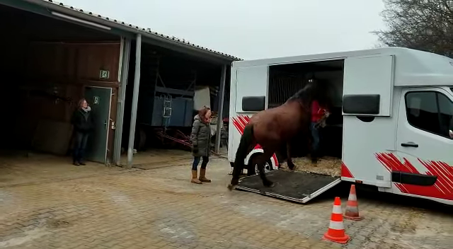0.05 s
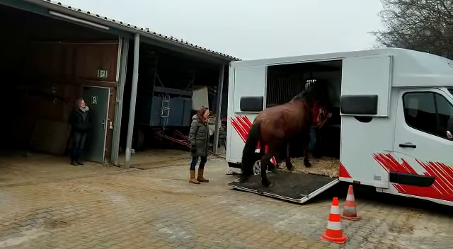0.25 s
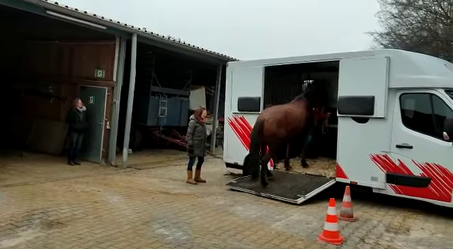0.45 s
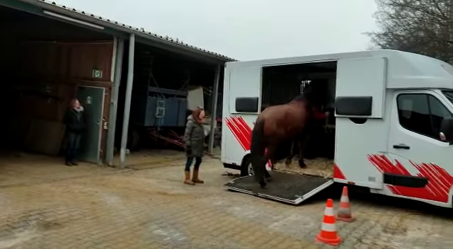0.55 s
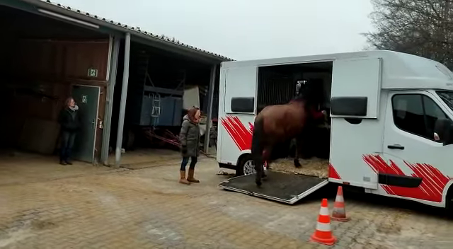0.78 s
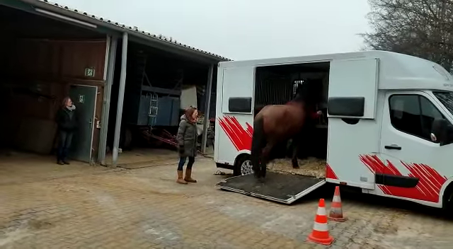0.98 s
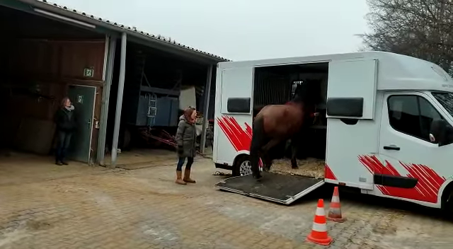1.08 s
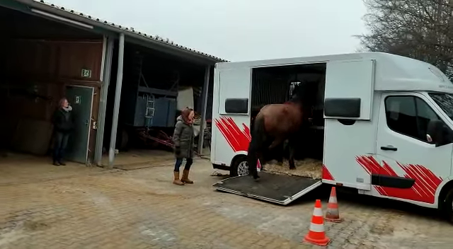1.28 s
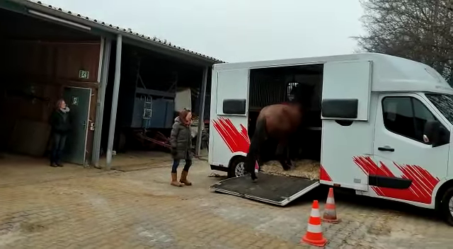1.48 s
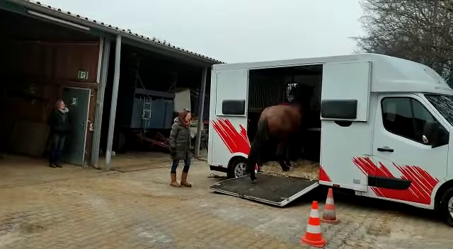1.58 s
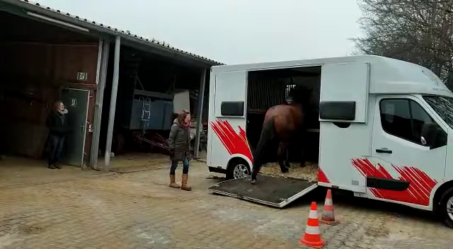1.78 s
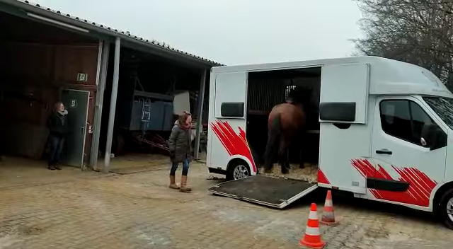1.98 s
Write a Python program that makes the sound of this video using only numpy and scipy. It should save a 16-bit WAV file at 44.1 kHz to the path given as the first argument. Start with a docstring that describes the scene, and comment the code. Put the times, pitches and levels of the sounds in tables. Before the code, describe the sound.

A horse's hooves thud up a hollow loading ramp, with a faint engine idling.

```python
"""A horse walks up a hollow loading ramp into a horsebox, a few metres from a stereo microphone in a yard.
One hoof knocks on the ramp, the next on the box floor, bouncing each deck and ringing its panels.
Softer steps follow inside, with small clicks of horn on grit or metal and rustling bedding.
The sheds give a weak echo; further right, an engine idles faintly under a light wind."""
import sys
import numpy as np
from scipy import signal
from scipy.fft import rfft, irfft, next_fast_len
from scipy.io import wavfile
from scipy.ndimage import map_coordinates

SR = 44100
rng = np.random.default_rng(int(sys.argv[2]) if len(sys.argv) > 2 else 0)


def wrap_up_sound(samples):
    """Save the sound to the file named by the first command line argument, as 16-bit audio."""
    columns = np.atleast_2d(samples).T
    # keep every value between -1 and 1, then stretch to whole-number steps
    tamed = np.clip(columns, -1, 1)
    steps = np.round(tamed * 32767).astype(np.int16)
    wavfile.write(sys.argv[1], SR, steps)


N = 90404

# how alike the horse's noises are in the two channels: f/Hz, likeness
HORSE_ALIKE = [(100, .998), (400, 0.96), (900, 0.95), (2000, 0.18), (6000, 0.081)]


def amp(db):
    return 10 ** (np.asarray(db) / 20)


def unit_rms(x):
    return x / np.sqrt(np.mean(x ** 2) + 1e-20)


def along(points, hz):
    """Read (f/Hz, value) points on a log frequency axis."""
    f, values = np.transpose(points)
    return np.interp(np.log(hz + 1), np.log(f + 1), values)


def wobble(rate):
    """A smooth random curve, rate knots a second."""
    knots = rng.standard_normal(int(N * rate / SR) + 4)
    return map_coordinates(knots, [np.arange(N) * rate / SR])


def filtered(x, response):
    """Shape x by a response given as a function of frequency."""
    n = x.shape[-1]
    padded = next_fast_len(n + 4096)
    hz = np.fft.rfftfreq(padded, 1 / SR)
    return irfft(rfft(x, padded) * response(hz), padded)[..., :n]


def noise(size, colour, alike):
    """Coloured stereo noise of rms 1 with a given left-right likeness."""
    def mid_side_gains(hz):
        angle = np.arccos(np.clip(along(alike, hz), -1, 1)) / 2
        return colour(hz) * [np.cos(angle), np.sin(angle)]
    mid, side = filtered(rng.standard_normal((2, size)), mid_side_gains)
    return unit_rms(np.array([mid + side, mid - side]))


def band(centre_hz, octaves):
    """A bell-shaped colour on a log frequency axis."""
    return lambda hz: np.exp(-.5 * (np.log2((hz + 1) / centre_hz) / octaves) ** 2)


def fade(t, rise_s, t60):
    """A quick rise and an exponential decay."""
    return (1 - np.exp(-t / rise_s)) * np.exp(-np.log(1000) * t / t60)


def burst(t, centre_hz, t60, octaves, rise_s):
    """A dying band of noise, with the same energy on every blow."""
    envelope = fade(t, rise_s, t60)
    hiss = noise(len(t), band(centre_hz, octaves), HORSE_ALIKE)
    return unit_rms(envelope * hiss) * np.sqrt(np.mean(envelope ** 2))


def add(out, start_s, sound):
    """Mix a sound in at start_s."""
    part = out[:, round(start_s * SR):][:, :sound.shape[-1]]
    part += sound[..., :part.shape[-1]]


def from_right(x, lag_s):
    """Sound from the right reaches the left microphone port lag_s later."""
    return filtered(x, lambda hz: np.exp(-2j * np.pi * hz * lag_s * np.array([[.5], [-.5]])))


def wind():
    """Light wind and distant noise, swelling a little."""
    # spectrum of the open air: f/Hz, relative level/dB
    spectrum = [(20, -4), (60, -6), (100, -18), (180, -18.5), (300, -27), (650, -28), (1100, -30),
                (1900, -29), (3000, -40), (5000, -49), (7700, -52), (8600, -64.5), (14000, -59)]
    # how alike the air is in the two channels: f/Hz, likeness
    alike = [(40, 0.59), (200, 1), (600, 0.52), (1300, 0.37), (8000, 0.033)]
    level_db = -50 + 0.5 * wobble(4.5)
    return amp(level_db) * noise(N, lambda hz: amp(along(spectrum, hz)), alike)


def engine():
    """An idling engine hums at multiples of its slightly unsteady firing rate."""
    # partials of the hum: multiple of the firing rate, level/dB
    orders = [(1, -49.5), (2, -57), (3, -71.5), (4, -71)]
    firing_hz, drift, waver_db = 43.92, 0.0077, 1.46
    phase = 2 * np.pi * np.cumsum(firing_hz * (1 + drift * wobble(5))) / SR
    hum = np.zeros(N)
    for order, db in orders:
        peak = np.sqrt(2) * amp(db + waver_db * wobble(11.07))
        hum += peak * np.sin(order * phase + rng.uniform(0, 2 * np.pi))
    return hum


def yard_echo(x):
    """The echo off the sheds round the yard, nearly mono in the bass."""
    # reverberation time of the yard: f/Hz, t60/s
    decay_times = [(100, 0.5), (350, 0.52), (1000, 0.67), (8000, 0.099)]
    # colour of the echo: f/Hz, relative level/dB
    colour = [(70, -8.5), (350, -2.5)]
    # how alike the echo is in the two channels: f/Hz, likeness
    alike = [(150, 0.82), (500, 0.3), (1200, 0.045)]
    reflections = noise(SR // 2, lambda hz: amp(along(colour, hz)), alike)
    hz, t, spectra = signal.stft(reflections, SR, nperseg=256)
    decay = np.exp(-np.log(1000) * t / along(decay_times, hz)[:, None])
    _, tail = signal.istft(spectra * decay, SR, nperseg=256)
    return signal.fftconvolve(x, tail / np.linalg.norm(tail[0]), axes=1)[:, :N]


def bedding():
    """The bedding in the box gives a faint, fluttering rustle as the horse moves in."""
    # course of the rustle: t/s, level/dB
    rustle = [(0, -80), (.3, -74.5), (.55, -75.5), (.7, -74.5), (.85, -81), (1, -78.5), (1.15, -81.5),
              (2.05, -79)]
    course_db = np.interp(np.arange(N) / SR, *np.transpose(rustle))
    flutter_db = wobble(60)
    return amp(course_db + flutter_db) * noise(N, band(centre_hz=7000, octaves=1), HORSE_ALIKE)


def hoof_clicks():
    """Short bright cracks and scuffs where horn meets grit or metal."""
    # hard contacts: t/s, level/dB, centre f/Hz, width/octaves, t60/s
    contacts = [(.21, -67.5, 6760, .6, 0.28), (.4555, -34.5, 1456, 0.2, 0.038),
                (.4555, -46.5, 2530, 0.17, 0.044), (.4555, -50.5, 5870, 0.41, 0.015),
                (.904, -56, 6860, 0.54, 0.013), (1.524, -54.5, 13350, 0.13, 0.017),
                (1.524, -62, 2900, 1.1, 0.13), (1.538, -67, 10000, 1.2, 0.26)]
    out, t = np.zeros((2, N)), np.arange(SR // 3) / SR
    for start_s, db, hz, octaves, t60 in contacts:
        add(out, start_s, amp(db) * burst(t, hz, t60, octaves, rise_s=0.001))
    return out


def struck_deck(steps, modes, panels, bounce_hz, bounce_rise_s, bounce_t60):
    """The horse's weight bounces the whole deck, and each hoof rings its modes and panels."""
    out, t = np.zeros((2, N)), np.arange(SR // 2) / SR
    bounce = fade(t, bounce_rise_s, bounce_t60) * np.sin(2 * np.pi * bounce_hz * t)
    for start_s, knock_db, cutoff_hz, bounce_db in steps:
        ring = np.zeros(len(t))
        for k, (hz, db, t60) in enumerate(modes):
            strength = (-1) ** k * amp(db + rng.normal(0, 0.68))
            ring += strength * fade(t, rise_s=.0015, t60=t60) * np.sin(2 * np.pi * hz * t)
        clatter = sum(amp(db) * burst(t, hz, t60, octaves=.35, rise_s=.0022) for hz, db, t60 in panels)
        lowpass = signal.butter(2, cutoff_hz, fs=SR, output="sos")  # a soft contact loses the treble
        knock = signal.sosfilt(lowpass, ring + clatter)
        add(out, start_s, amp(knock_db) * knock - amp(bounce_db) * bounce)
    return out


def hooves_on_ramp():
    """Hooves knock on the hollow loading ramp."""
    # hoof falls: t/s, knock level/dB, contact cutoff f/Hz, bounce level/dB
    steps = [(.2115, -23.5, 1500, -42), (.235, -44, 1180, -14), (.384, -40.5, 302, -79),
             (1.171, -50.5, 590, -73)]
    # modes of the ramp: f/Hz, relative level/dB, t60/s
    modes = [(124.3, -8, 0.5), (161.2, -3, 0.28), (198.1, -3.5, 0.336), (246, -1, .17), (280, -14.5, 0.25),
             (356.7, -9, 0.2), (443.6, -21, 0.28), (594.4, -6, 0.15), (659.5, -14.5, 0.15),
             (840, -14, 0.14)]
    # bands of crowded panel modes: f/Hz, relative level/dB, t60/s
    panels = [(250, -7.5, 0.24), (512, -12.5, 0.3), (890, -16.5, 0.2), (1850, -30, 0.36),
              (3300, -29.5, 0.4)]
    return struck_deck(steps, modes, panels, bounce_hz=64.6, bounce_rise_s=.018, bounce_t60=.24)


def hooves_on_floor():
    """One hard knock on the box floor, then softer steps inside."""
    # hoof falls: t/s, knock level/dB, contact cutoff f/Hz, bounce level/dB
    steps = [(.4535, -24, 6700, -19), (.4865, -35, 403, -31), (.675, -45.5, 210, -42),
             (1.049, -44, 250, -28), (1.115, -52, 200, -37), (1.532, -44, 650, -41.5),
             (2.018, -58, 606, -65)]
    # modes of the floor: f/Hz, relative level/dB, t60/s
    modes = [(90.4, -21, .22), (117.7, 0, 0.23), (145.4, -5, .19), (188.8, -1.5, 0.21), (255, -14, 0.28),
             (314, -15, .22), (387.4, -19, 0.22), (578, -18.5, 0.19), (676, -19.5, 0.12)]
    # bands of crowded panel modes: f/Hz, relative level/dB, t60/s
    panels = [(420, -13.5, 0.27), (787, -16, 0.24), (1770, -25.5, 0.27), (3220, -33.5, 0.26),
              (6900, -36, 0.25)]
    return struck_deck(steps, modes, panels, bounce_hz=68.5, bounce_rise_s=.01, bounce_t60=.3)


def scene():
    """The horse is a few metres off and a little to the right, the engine and wind further right."""
    hooves = from_right(hooves_on_ramp() + hooves_on_floor() + hoof_clicks(), lag_s=0.00015)
    horse = hooves + amp(-17.5) * yard_echo(hooves) + bedding()
    background = from_right(engine() + wind(), lag_s=0.00036)
    return horse + background


def record(dry):
    """A stereo microphone whose two ports differ in colour; nothing is kept above the band limit."""
    # balance between the ports: f/Hz, left minus right level/dB
    balance = [(600, 0), (1200, 1.5), (2200, 3), (5000, -2.5), (9000, -0.5)]
    top_hz = 14350
    split = np.array([[.5], [-.5]])
    return filtered(dry, lambda hz: amp(along(balance, hz) * split) * (hz < top_hz))


dry = scene()
out = record(dry)
wrap_up_sound(out)
```